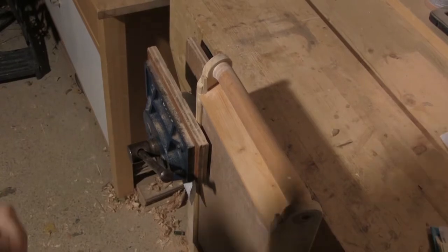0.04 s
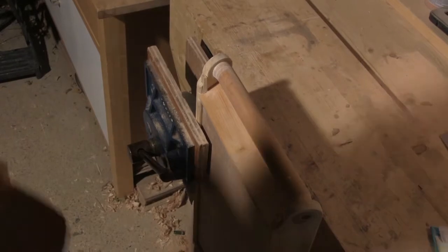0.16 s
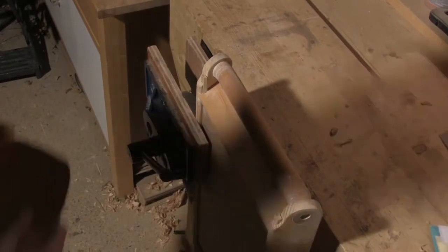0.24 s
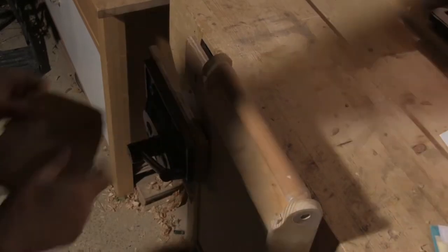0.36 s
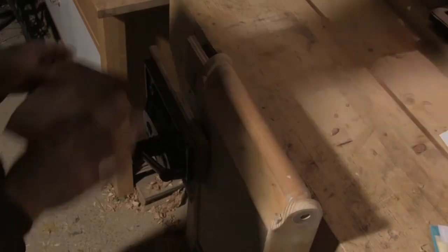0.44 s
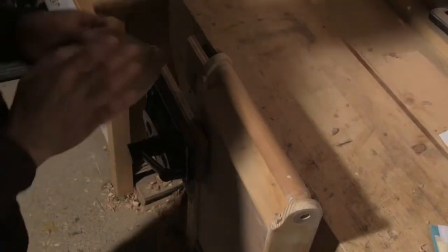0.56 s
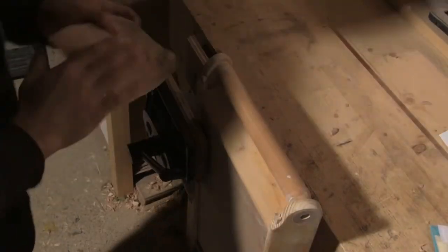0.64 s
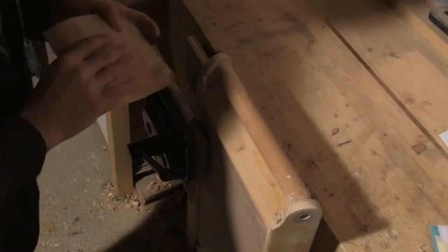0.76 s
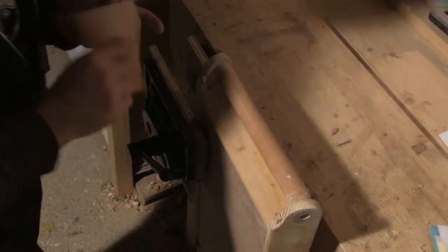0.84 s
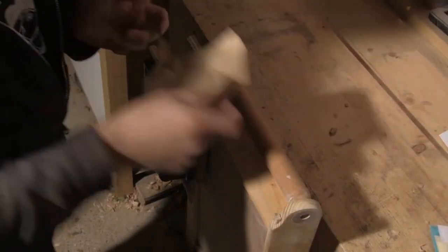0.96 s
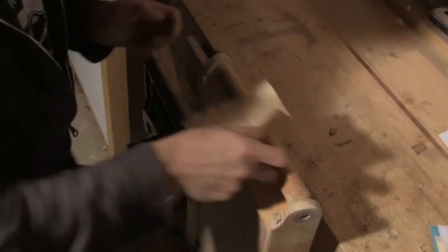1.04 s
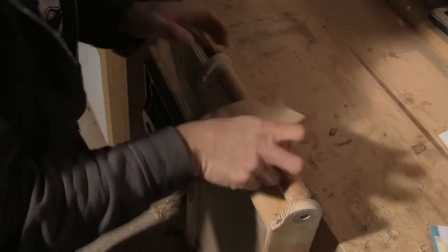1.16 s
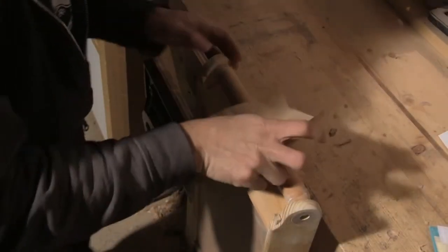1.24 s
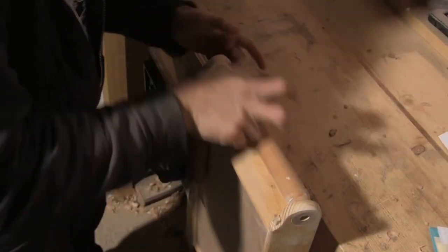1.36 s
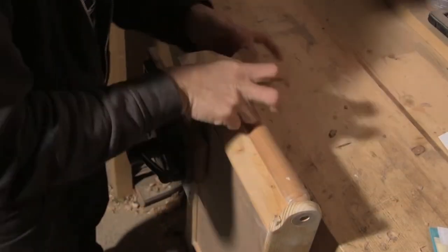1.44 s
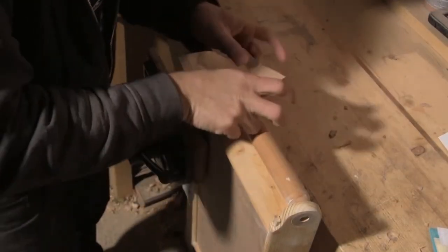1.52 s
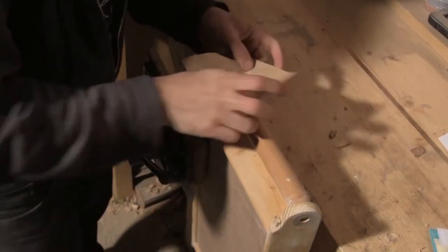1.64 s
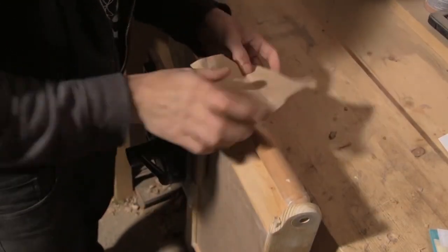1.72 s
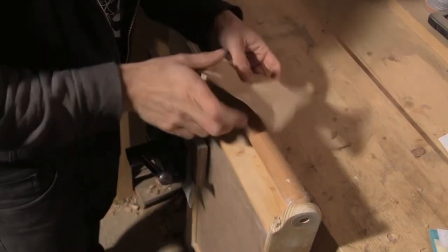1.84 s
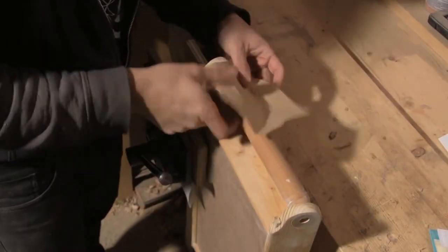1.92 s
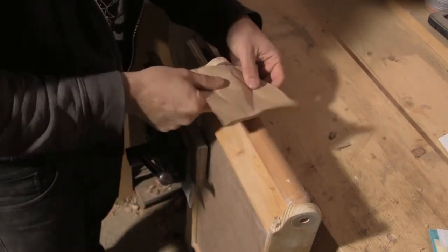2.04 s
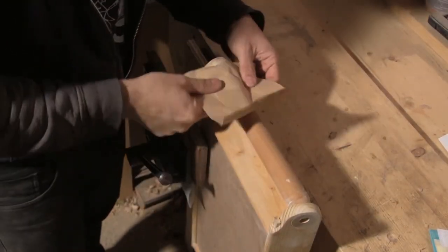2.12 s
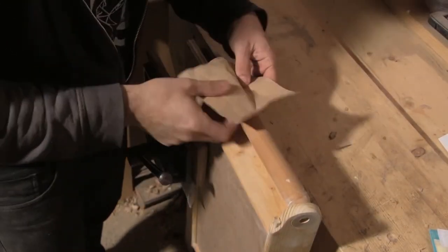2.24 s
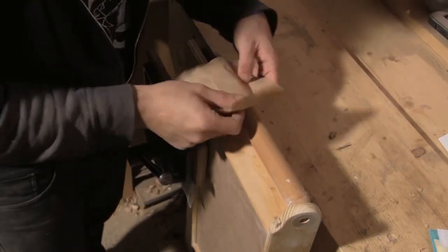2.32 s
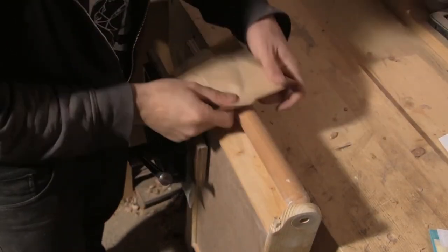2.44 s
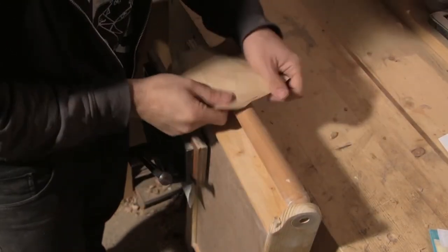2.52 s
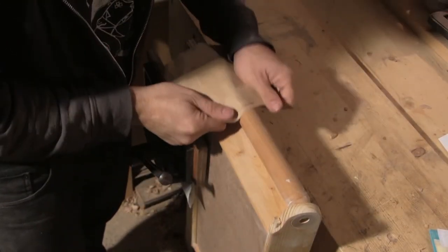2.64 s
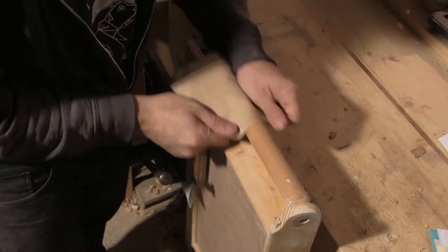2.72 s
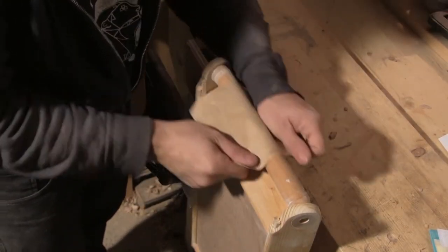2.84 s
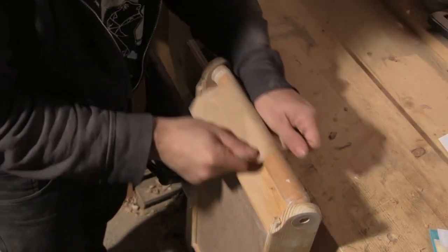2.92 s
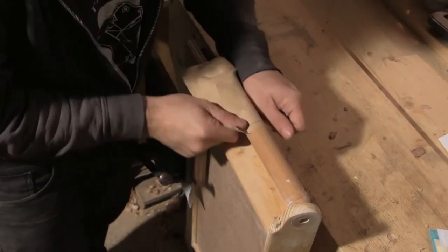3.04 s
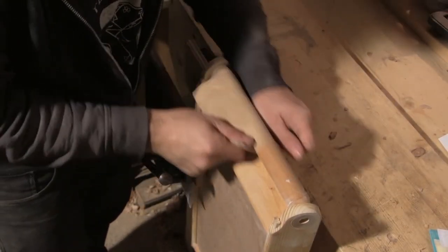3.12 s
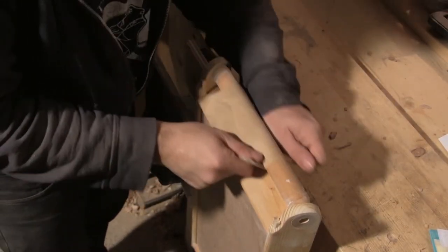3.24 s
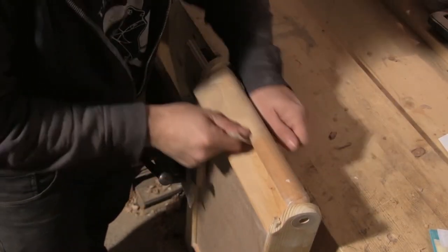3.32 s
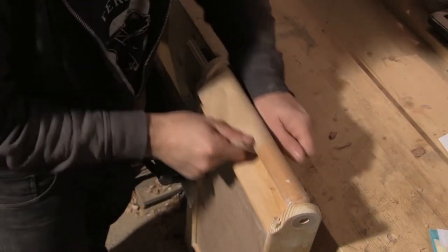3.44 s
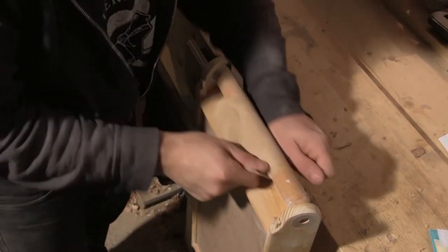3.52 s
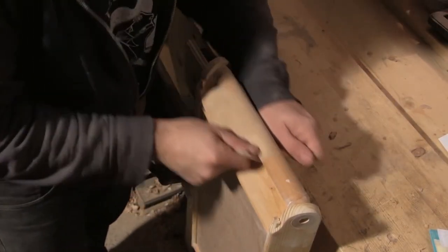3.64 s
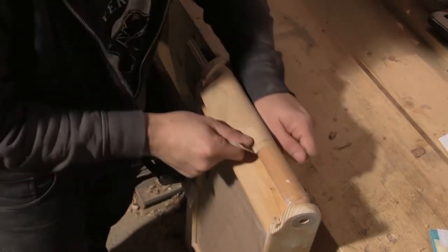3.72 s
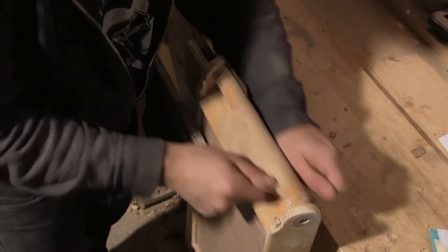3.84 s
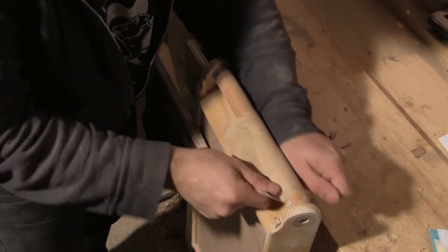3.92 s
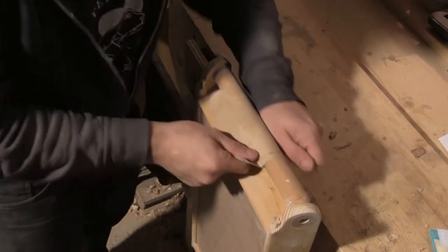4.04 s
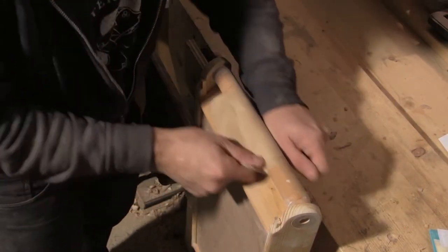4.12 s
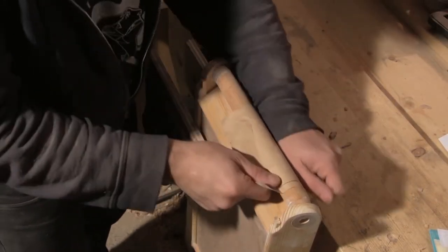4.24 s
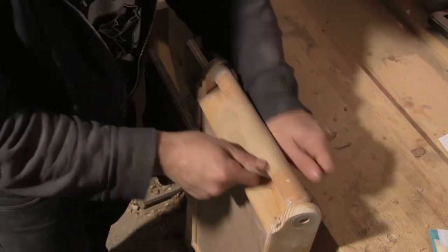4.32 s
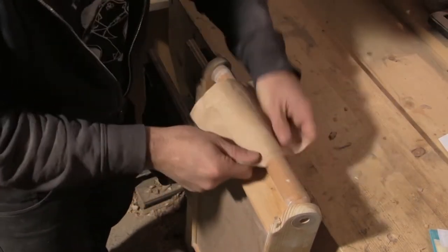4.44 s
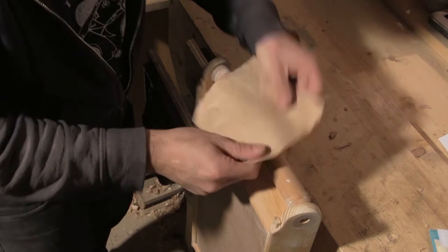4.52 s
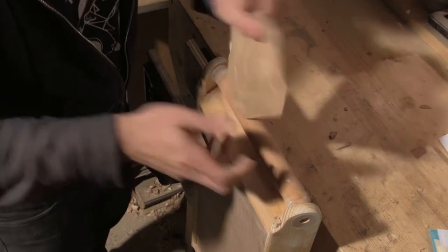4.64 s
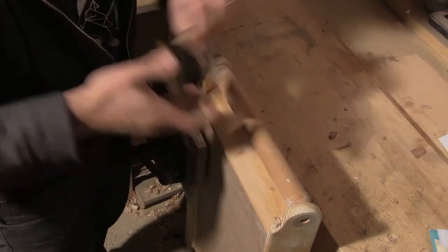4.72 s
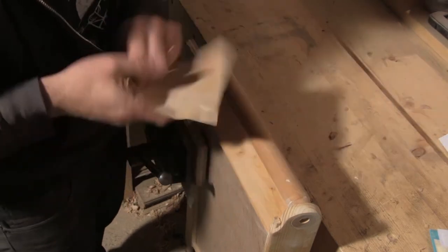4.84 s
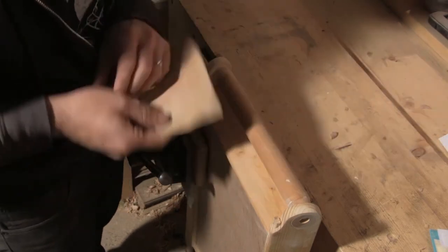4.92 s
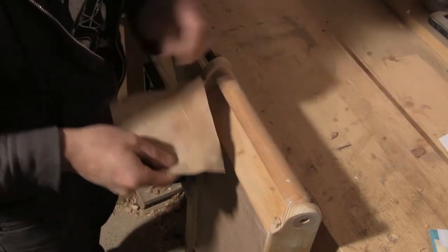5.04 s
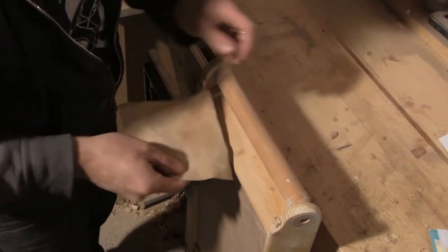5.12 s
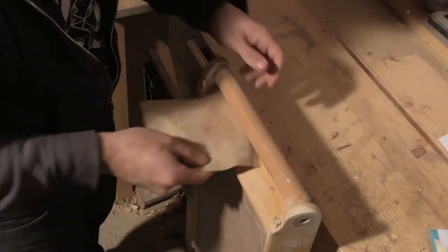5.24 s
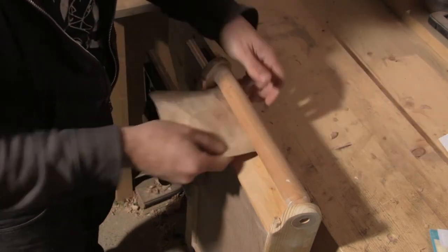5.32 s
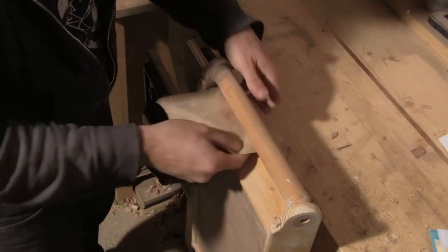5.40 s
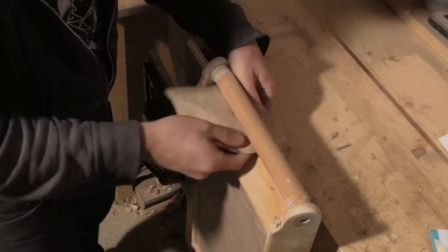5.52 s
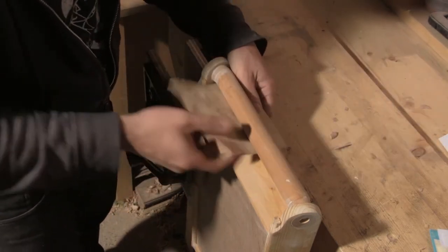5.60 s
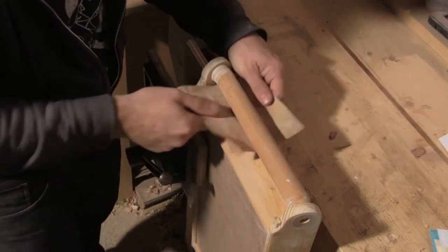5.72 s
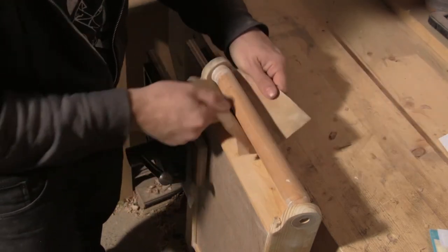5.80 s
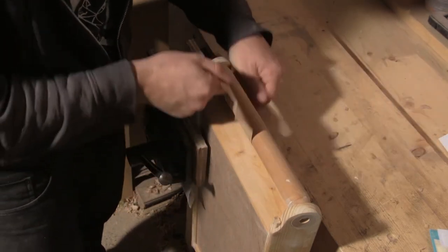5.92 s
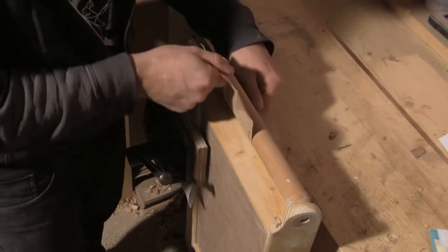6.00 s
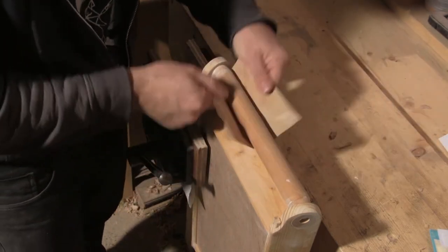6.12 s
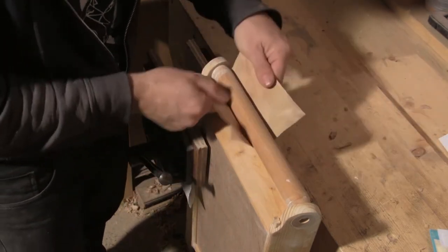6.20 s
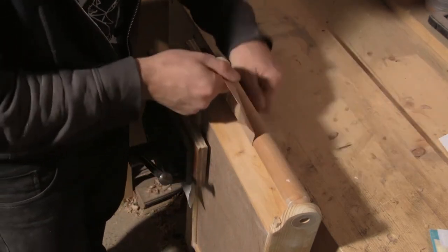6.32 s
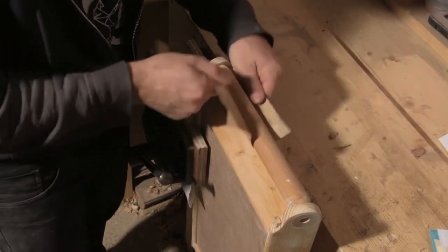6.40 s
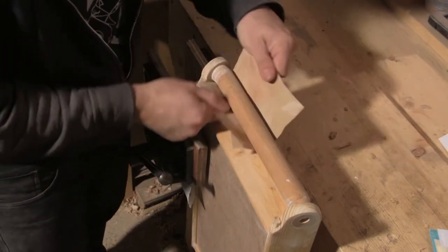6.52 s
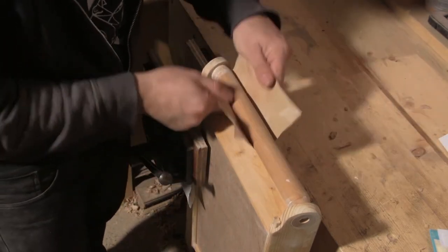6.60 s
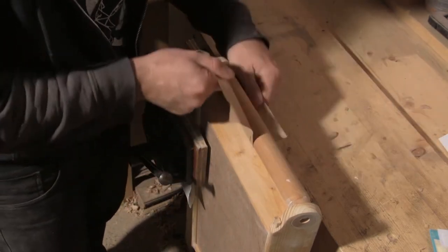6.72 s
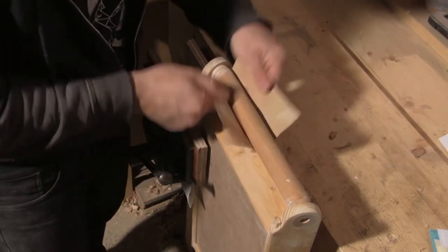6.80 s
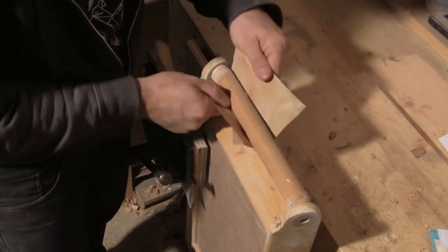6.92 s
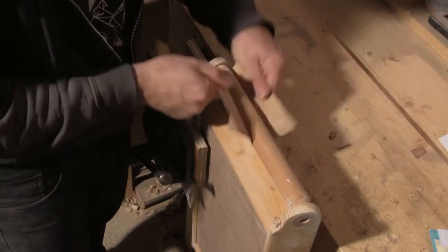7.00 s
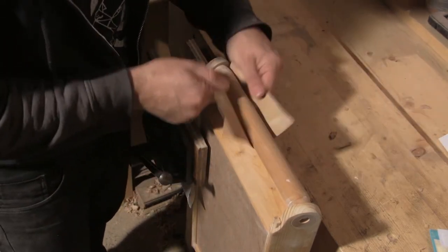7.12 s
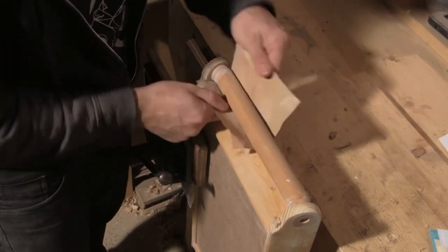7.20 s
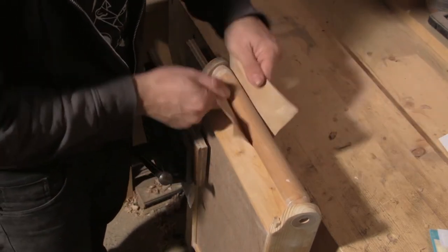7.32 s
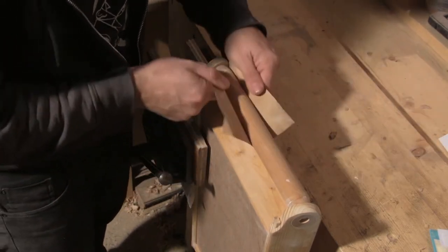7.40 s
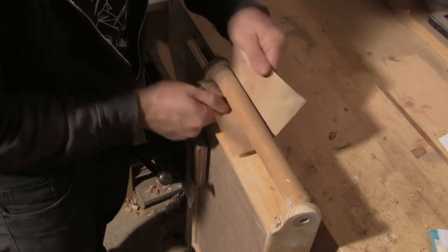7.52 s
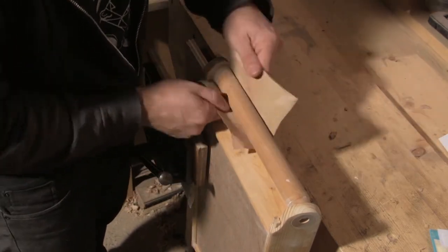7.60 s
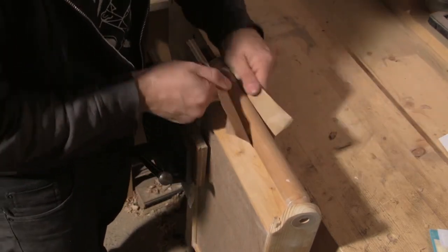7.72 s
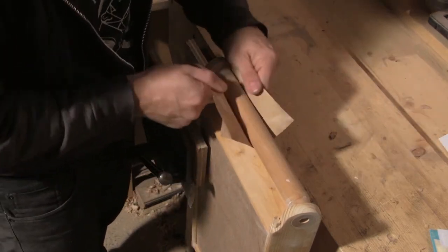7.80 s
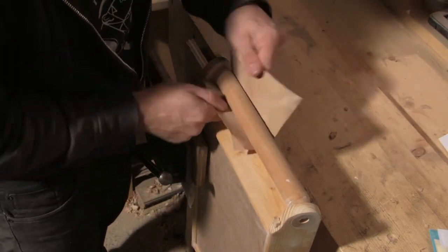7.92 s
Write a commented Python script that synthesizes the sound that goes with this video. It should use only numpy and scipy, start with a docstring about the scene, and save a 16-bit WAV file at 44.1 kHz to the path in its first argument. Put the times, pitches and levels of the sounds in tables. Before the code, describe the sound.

Sandpaper crinkles and snaps in the hands, then rasps along a wooden handle in quick even strokes, paused once and resumed harder in a small workshop.

```python
"""Sandpaper on a round wooden handle

A sheet is handled, wrapped over the handle and pulled to and fro in a small workshop, then threaded under it
for shorter, harder strokes. Dense grit clicks ring through paper, handle and box; bends and knocks are short
bursts of resonant noise. A bench shudder, the shop's echoes and its quiet air lie around them, on one microphone.
"""
import sys
import numpy as np
from scipy import signal
from scipy.fft import rfft, irfft, next_fast_len
from scipy.io import wavfile

SR = 44100
rng = np.random.default_rng(int(sys.argv[2]) if len(sys.argv) > 2 else 0)


def to_wav(s):
    """Save 16-bit WAV."""
    ch = np.atleast_2d(s).T  # columns
    pcm = np.round(np.clip(ch, -1, 1) * 32767)  # PCM
    wavfile.write(sys.argv[1], SR, pcm.astype(np.int16))


N = 351036


def from_db(db):
    """Amplitude gain of a level in dB."""
    return 10 ** (np.asarray(db) / 20)


def rms_one(x):
    """Scale to unit rms."""
    return x / np.sqrt(np.mean(x ** 2) + 1e-20)


def peak_one(x):
    """Scale to unit peak."""
    return x / np.max(np.abs(x))


def at_hz(points, hz):
    """Read a spectrum in dB on a log frequency axis."""
    point_hz, level_db = np.transpose(points)
    return np.interp(np.log(hz), np.log(point_hz), level_db)


def drift(rate_hz):
    """Slow random wander with spread near 1: noise through two equal low-passes, made at SR / 40."""
    r = np.exp(-80 * np.pi * rate_hz / SR)
    noise = rng.standard_normal(N // 40 + 2002)
    slow = signal.lfilter([1], [1, -2 * r, r * r], noise)[2000:]   # drop the filter's start-up
    return np.interp(np.arange(N) / 40, np.arange(len(slow)), rms_one(slow))


def resonate(x, hz, width_hz):
    """Two-pole resonance with gain 1 at its top."""
    r = np.exp(-np.pi * width_hz / SR)
    poles = [1, -2 * r * np.cos(2 * np.pi * hz / SR), r * r]
    return signal.lfilter([(1 - r * r) / 2, 0, (r * r - 1) / 2], poles, x)


# quiet of the shop, relative spectrum: (f/Hz, level/dB per Hz)
AIR_SPECTRUM = [(12, -45), (30, -6), (70, -3), (140, -2), (220, 8.5), (420, -5), (790, -3), (1270, -6),
                (2920, -6.5), (9960, -36), (15600, -44)]
AIR_DB = -61   # middle of the wavering level


def air():
    """Slightly wavering low rumble and faint hiss of the shop: noise shaped by a fixed spectrum."""
    hz = np.arange(1, N // 2 + 2) * SR / N
    shaped = irfft(rfft(rng.standard_normal(N)) * from_db(at_hz(AIR_SPECTRUM, hz)), N)
    return from_db(AIR_DB + 0.53 * drift(2.3)) * rms_one(shaped)


# the bench rocks under the strokes: (t/s, level/dB before a small trim)
BENCH_ROCKING = [(0.0, -82), (0.53, -85), (2.88, -72), (2.9, -64), (3.21, -71), (3.26, -88), (3.41, -66),
                 (3.79, -78), (3.86, -73), (5.23, -81), (5.25, -90), (5.45, -70), (5.5, -83), (7.54, -64),
                 (7.65, -76), (7.69, -64), (7.92, -82), (7.96, -76)]
ROCKING_HZ, ROCKING_WIDTH_HZ = 75.4, 35


def rocking():
    """A deep shudder of the bench: noise through two low resonances, swelling and sinking in level."""
    s, level_db = np.transpose(BENCH_ROCKING)
    shudder = resonate(rng.standard_normal(N), ROCKING_HZ, ROCKING_WIDTH_HZ)
    shudder = resonate(shudder, ROCKING_HZ, 60)
    trim_db = -0.5
    return from_db(np.interp(np.arange(N) / SR, s, level_db) + trim_db) * rms_one(shudder)


# each rub of the sheet, light brushes and full strokes alike, levels before the trims in sliding():
# (start t/s, length t/s, fastest moment as share of the length, rasp level/dB, then level/dB against the rasp:
# bite of the grit, fine hiss, drumming of the box, hollow of the sheet; brightening from start to end/dB)
RUB_STROKES = [(0.014, 0.095, 0.9, -56, -7, -1, -2, 4, 11),
               (0.087, 0.24, 0.076, -56, 0.5, -1.5, -20, -3, 6),
               (0.2, 0.067, 0.46, -58.5, 6, -2, -5, -1, 0), (0.343, 0.081, 0.85, -60, 1, -1.5, -9, 4, 4),
               (0.436, 0.054, 0.85, -58, -5, -9, 2, -13, -6),
               (0.493, 0.087, 0.061, -48.5, -7, -14.5, -4, -6.5, 4),
               (0.667, 0.104, 0.57, -54, -0.5, -9, -11, -15, 5),
               (0.774, 0.037, 0.9, -57, -2, -7, -12, -10, -2), (0.811, 0.09, 0.17, -46.5, 1, -4, -5, 3, -3),
               (0.897, 0.077, 0.24, -48.5, 0, -5, -10, 0, -7),
               (0.956, 0.11, 0.21, -47, -3, -12, -2, 7.5, 19),
               (1.041, 0.12, 0.07, -53.5, -3, -8, -5, -6, -3),
               (1.177, 0.12, 0.14, -41.5, -4.5, -6, -7.5, -5.5, 8),
               (1.304, 0.13, 1, -40.5, -4, -8, -5.5, -4.5, 0),
               (1.43, 0.12, 0.63, -39.5, -0.5, 1.5, -12, -5, -20),
               (1.507, 0.047, 0.08, -34, -8, -16, -10.5, -3, 0),
               (1.536, 0.12, 0.17, -47.5, -1, -15, -2, -5, 0),
               (1.677, 0.095, 0.87, -48, 2, -7, -16, -11, -11),
               (1.757, 0.11, 0.39, -42, -8.5, -14, -16, -9, -9),
               (1.888, 0.1, 0.51, -45, -5.5, -15, -10, -6, -1),
               (1.988, 0.067, 0.9, -43.5, -5, -15, -7, -8, 2),
               (2.056, 0.11, 0.93, -37.5, -4.5, -11, -4.5, -9, 12),
               (2.206, 0.088, 0.38, -51, 3, -12, -1, -8, 3),
               (2.28, 0.062, 0.06, -35.5, -6, -15, -13, -8, -3), (2.3, 0.15, 0.3, -50, -3, -7, -10, -20, 0),
               (2.377, 0.21, 0.8, -46, -3, -8, -2, -20, -5),
               (2.517, 0.099, 0.65, -38.5, -4.5, -4.5, -8, -10, 0),
               (2.621, 0.15, 0.45, -45.5, -1, -9, -1, 8, 0),
               (2.76, 0.24, 0.49, -27, -1.5, -5.5, -15, -7, 7),
               (3.019, 0.14, 0.61, -25.5, -5.5, -6.5, -15, -10.5, -5),
               (3.181, 0.15, 0.63, -27, -1.5, -5, -14.5, -12, 5),
               (3.359, 0.12, 0.67, -23.5, -5, -8, -17.5, -15.5, -4),
               (3.511, 0.17, 0.43, -27, -4, -3.5, -19, -14.5, 10),
               (3.702, 0.13, 0.51, -27.5, -5.5, -6.5, -20, -17, -11),
               (3.857, 0.16, 0.62, -28, -2, -1.5, -30, -14.5, -8),
               (4.049, 0.15, 0.43, -26, -3, -4, -20.5, -15.5, -3),
               (4.216, 0.16, 0.53, -29, -4.5, -4, -17, -11, -2),
               (4.388, 0.19, 0.25, -27.5, -2.5, -4.5, -21, -14.5, 3),
               (4.556, 0.17, 0.053, -41, -3.5, -4.5, -24, -6.5, -10),
               (4.746, 0.083, 0.07, -53, -12, -6, -3, -2, 2),
               (4.867, 0.043, 0.059, -45.5, 0, -5, 7, -1, -6),
               (4.91, 0.088, 0.69, -41.5, -2, -8, -6, -2, 4),
               (4.996, 0.075, 0.062, -39.5, -2, -2.5, -4.5, -3.5, -6),
               (5.093, 0.033, 0.07, -52.5, -5, -13, 5, -4, 10),
               (5.283, 0.049, 0.99, -60, -4, -16, -6, 6, 10), (5.332, 0.061, 0.51, -50, 7, 3, 12, -3, 1),
               (5.409, 0.11, 0.35, -37, 1.5, -7.5, -7, -13, 19),
               (5.489, 0.11, 0.46, -36.5, 5, -3.5, -3, -5.5, -5), (5.623, 0.063, 1, -54, 9, -8, 5, 5, -8),
               (5.685, 0.2, 0.36, -43, 1, -8.5, -9, -5, -7), (5.869, 0.082, 0.21, -41, -3, -13, -4, -6, -7),
               (5.964, 0.14, 0.91, -29.5, 1.5, -4.5, -17.5, -8.5, -2),
               (6.184, 0.11, 0.64, -24.5, 3.5, -1.5, -9, -8.5, -7),
               (6.3, 0.065, 0.5, -46, -14, -10, -10, -3, 0), (6.35, 0.14, 0.22, -27.5, 3.5, 0, -13, -4, 1),
               (6.521, 0.12, 0.34, -26.5, 4.5, 0.5, -15, -6, -10),
               (6.702, 0.12, 0.24, -26.5, 3.5, 2, -14, -8, 12),
               (6.868, 0.11, 0.59, -25, 1.5, 0, -11.5, -8, -9), (7.0, 0.038, 0.37, -42, -12, -13, 0, -4, 3),
               (7.056, 0.12, 0.31, -25, 0.5, -0.5, -12, -7, 7),
               (7.225, 0.12, 0.39, -26, 2.5, 0.5, -5, -8, -9),
               (7.402, 0.11, 0.51, -24.5, -0.5, -2, -11.5, -7, -4),
               (7.581, 0.091, 0.18, -22.5, -2.5, -4, -11, -9, -8),
               (7.755, 0.11, 0.34, -23, -1, -3.5, -12.5, -11.5, -10.5),
               (7.945, 0.098, 0.17, -21, -0.5, -3, -14, -13, 4)]
# faint rustle of sheet and fingers, running on under and between the rubs:
# (t/s, middle level/dB, treble level/dB, low level/dB), before the trims in sliding()
RUSTLE_LEVELS = [(0.0, -49, -59.5, -55), (0.3, -80, -70, -66), (0.63, -85, -72, -81), (1.15, -54, -58, -67),
                 (1.67, -54, -61, -61), (2.2, -52.5, -54.5, -48), (2.74, -47, -54, -54.5),
                 (3.5, -44.5, -51, -48), (4.4, -52, -51, -48.5), (4.84, -78, -57, -66.5),
                 (5.2, -71, -69.5, -67), (5.4, -65, -63, -62), (5.65, -54, -53, -52.5),
                 (6.15, -49, -51.5, -51), (6.5, -44, -46, -44.5), (7.0, -43.5, -46.5, -46.5),
                 (7.57, -56, -50, -49), (7.96, -55, -52, -57)]
# level/dB added to the rustle's treble for bite and hiss, and to its low for box and hollow
RUSTLE_SPLIT = [-0.5, -3, 0, -3.1]
# loudness follows hand speed to these powers: (rasp, bite, hiss, box, hollow)
HAND_SPEED_POWER = [1.02, 1.2, 1.13, 0.6, 0.75]
# change from start to end of every rub: (rasp, bite, hiss, box, hollow), each level/dB
RUB_LEAN = [-0.45, -1, 0.85, 2.4, 1.7]
# share of a rub's own brightening: (rasp, bite, hiss, box, hollow)
BRIGHTENING_SHARE = [-0.35, .6, 0.17, -0.79, -0.69]
BREAKAWAY_RAD = 0.31   # the sheet sticks at first and breaks loose part way up the arch
RING_OUT_S = 0.0074    # the sheet keeps sounding briefly as the hand slows


def hand():
    """Levels in dB of rasp, bite, hiss, box and hollow: each rub's speed is a lopsided arch over the rustle."""
    t = np.arange(N) / SR
    s, middle_db, treble_db, low_db = np.transpose(RUSTLE_LEVELS)
    rustle_db = np.array([middle_db, treble_db, treble_db, low_db, low_db])
    rustle_db = rustle_db + np.r_[0, RUSTLE_SPLIT][:, None]
    power = np.zeros((5, N))
    for start, length, fastest, rasp_db, *colour_db, brighter_db in RUB_STROKES:
        span = slice(max(round(start * SR), 0), round((start + length) * SR))
        along = (t[span] - start) / length
        turns = [0, np.clip(fastest, .03, .97), 1]
        phase = np.interp(along, turns, [BREAKAWAY_RAD, np.pi / 2, np.pi])
        loudness = np.abs(np.sin(phase)) ** np.array(HAND_SPEED_POWER)[:, None]
        lean_db = np.array(RUB_LEAN) + brighter_db * np.array(BRIGHTENING_SHARE)
        level_db = rasp_db + np.r_[0, colour_db][:, None] + np.outer(lean_db, along - .5)
        power[:, span] += (from_db(level_db) * loudness) ** 2
    r = np.exp(-1 / (RING_OUT_S * SR))
    power = signal.lfilter([1 - r], [1, -r], power + 1e-18)
    rustle = from_db([np.interp(t, s, level) for level in rustle_db])
    return 10 * np.log10(power + rustle ** 2)


def grit(per_s, spread_db):
    """Grains of abrasive catching the fibres: random clicks of uneven size and either sign."""
    sizes = from_db(spread_db * np.minimum(rng.exponential(1, N), 4)) * rng.choice([-1, 1], N)
    return rms_one(sizes * (rng.random(N) < per_s / SR))


def body(x, modes, lift_db, wander_db):
    """The direct sound plus the modes, each rung more or less as the contact moves along the wood."""
    out = x
    for hz, width_hz, level_db in modes:
        gain = from_db(lift_db + level_db + wander_db * drift(5.4))
        out = out + gain * resonate(x, hz, width_hz)
    return out


# basic colour of the rasp, relative spectrum: (f/Hz, level/dB per Hz)
RASP_SPECTRUM = [(60, -60), (110, -26), (160, -28.5), (215, -9.5), (300, -5), (420, -7), (650, -7.5),
                 (960, -9), (1300, -4.5), (2000, -1.5), (4000, -5), (8250, -9), (12300, -12.5),
                 (15600, -21.5)]
# resonances of handle, box and sheet, sheet over the handle: (f/Hz, width f/Hz, level/dB before body()'s lift)
OVER_MODES = [(225, 40, -5), (428, 30, 6), (660, 60, -10), (1030, 70, -7), (1400, 70, -7), (1660, 60, -3),
              (1945, 70, -7), (2340, 70, -6), (2570, 80, -6), (3840, 90, -7)]
# the same with the sheet under the handle: (f/Hz, width f/Hz, level/dB before body()'s lift)
UNDER_MODES = [(425, 40, -6), (465, 40, -4), (888, 55, -4), (1030, 55, -5), (1385, 70, -6), (1515, 60, -7),
               (1770, 90, -6), (1950, 90, -4), (2200, 70, -5), (2810, 80, -6)]
THREADED_S = 5.2   # the sheet changes place


def sliding():
    """Grit clicks ring the body; each half-octave follows the stroke and flickers as contact patches come and go."""
    t = np.arange(N) / SR
    rasp_db, *levels_db = hand()
    bite_db, hiss_db, box_db, hollow_db = levels_db - rasp_db
    clicks = grit(per_s=14000, spread_db=0.7)
    over = body(clicks, OVER_MODES, lift_db=2.5, wander_db=4)
    under = body(clicks, UNDER_MODES, lift_db=2.5, wander_db=4)
    rung = np.where(t < THREADED_S, over, under)
    size = next_fast_len(N)
    hz = np.arange(1, size // 2 + 2) * SR / size
    spectrum = rfft(rung, size) * from_db(at_hz(RASP_SPECTRUM, hz))
    out, together = np.zeros(N), drift(25.0)
    for centre_hz in 100 * 2 ** np.arange(0, 8, .5):
        window = np.clip(1 - 2 * np.abs(np.log2(hz / centre_hz)), 0, 1)
        band = irfft(spectrum * window, size)[:N]
        # share of each control in this band: box lowest, then hollow, rasp, bite and hiss
        octave = np.log2(centre_hz / 400)
        box, hollow, _, bite, hiss = (np.interp(octave, [0, 1, 2.3, 3.3, 4.6], w) for w in np.eye(5))
        colour_db = box * (box_db + 8.0) + hollow * (hollow_db + 11)
        colour_db = colour_db + bite * (bite_db + 5.0) + hiss * (hiss_db + 5.5)
        flicker_db = 1.26 * together + 2.18 * drift(8.8)   # shared by all bands, and this band's own
        out += band * from_db(colour_db + flicker_db)
    return from_db(rasp_db + 3.5) * rms_one(out)


# snaps and taps of sheet on wood, a few followed by their own bounce off the bench:
# (t/s, peak level/dB before bench echo and body, centre f/Hz, noise t60 t/s,
# treble level/dB and thud level/dB against the ring, both before the trims in snaps())
SHEET_SNAPS = [(0.0358, -35, 595, 0.076, -1, -6), (0.0855, -28.5, 620, 0.1, -26, -10),
               (0.219, -54, 344, 0.05, -15, -24), (0.247, -44, 232, 0.04, -16, -11),
               (0.2659, -35, 546, 0.047, -16, 9), (0.273, -37, 535, 0.035, -31, 11),
               (0.298, -46, 300, 0.04, -20, -18), (0.321, -37.5, 1000, 0.061, -19, 1),
               (0.468, -45.5, 412, 0.04, -15, -5), (0.676, -56, 392, 0.04, -13, -19),
               (0.7137, -38.5, 2820, 0.04, -6, -23), (0.818, -50, 252, 0.04, -15, -15),
               (0.9251, -37, 860, 0.04, 8, -11), (0.9527, -41, 1030, 0.03, -12, -7),
               (0.98, -26, 1130, 0.04, -20, -19), (1.203, -32.5, 716, 0.05, -10, -8),
               (1.5062, -16.5, 2030, 0.049, 18.5, -7), (1.51, -22, 1500, 0.038, -6, -30),
               (2.0567, -38, 480, 0.04, -10, -10), (2.126, -27.5, 2090, 0.037, -9, -17),
               (2.2812, -16.5, 1790, 0.085, 13, -14.5), (2.283, -14, 5250, 0.022, -16, -21.5),
               (2.3911, -30.9, 4060, 0.14, 2, -21), (2.47, -34.5, 4000, 0.028, 9, -24),
               (2.498, -39.5, 270, 0.04, -7, -9), (2.5385, -45, 415, 0.04, -1, -9),
               (2.6038, -23.5, 3320, 0.028, -6, -11.5), (2.637, -30, 1440, 0.035, -1, -10),
               (2.6501, -29.5, 448, 0.048, 12.5, -25), (2.668, -44, 440, 0.037, -1, -10),
               (2.6966, -25, 2980, 0.025, -3, -22), (2.7061, -25.5, 2960, 0.068, -7, -34),
               (2.753, -38.5, 428, 0.034, -15, -11), (3.06, -37, 413, 0.036, -20, -10),
               (3.109, -25, 440, 0.11, -22.5, -11), (3.449, -30, 333, 0.067, -22, -6),
               (3.532, -34.5, 553, 0.035, -20, -12), (4.062, -38, 417, 0.04, -15, -12),
               (4.76, -36, 4570, 0.029, -4, -22), (4.875, -33, 820, 0.046, -10, -10),
               (4.9175, -33, 563, 0.048, -10, -9), (5.1003, -44, 497, 0.04, -13, -8),
               (5.1427, -38, 570, 0.043, -22, -9), (5.2158, -41, 644, 0.058, -18, -16),
               (5.221, -43, 387, 0.024, -20, -10), (5.2927, -41.5, 1040, 0.06, -12, -12),
               (5.365, -40, 410, 0.05, -17, -1), (5.538, -32.5, 450, 0.042, -20, -8),
               (5.992, -32.5, 360, 0.053, -20, 0), (6.248, -22, 600, 0.033, -20, -19),
               (6.265, -27, 500, 0.036, -29, -7), (6.3293, -23, 1190, 0.083, -14, -6),
               (6.373, -30, 283, 0.04, -20, -13), (6.748, -29.5, 463, 0.045, -20, -12),
               (7.0113, -25.5, 410, 0.062, -11, -2), (7.758, -37, 484, 0.05, -24, -12)]
BENCH_ECHO_S, BENCH_ECHO_DB = 0.0055, -19


def snaps():
    """A sudden give or a bounce rings a patch of sheet or wood and thuds in the box; a short crackle follows."""
    out, t = np.zeros(N), np.arange(round(.12 * SR)) / SR
    noises = rng.standard_normal((len(SHEET_SNAPS), len(t)))
    for (s, peak_db, hz, t60, treble_db, thud_db), noise in zip(SHEET_SNAPS, noises):
        # high patches crackle on after the give, low ones mostly knock once
        push = noise * from_db(-60 * t / t60) * np.sqrt(hz / 1000)
        push[0] -= 24.0
        soft = np.exp(-2 * np.pi * 2.0 * hz / SR)   # a soft contact has a rounded front
        push = signal.lfilter([1 - soft], [1, -soft], push)
        ring = resonate(resonate(push, hz, 0.13 * hz + 30), hz, 1.8 * hz)
        crack = resonate(resonate(noise * from_db(-60 * t / 0.042), 2200, 2300), 2300, 4800)
        thud = resonate(resonate(push, 314, 680), 470, 1350)
        thud = thud + from_db(-3.0) * resonate(resonate(push, 182, 114), 200, 260)
        burst = peak_one(ring) + from_db(treble_db - 13) * peak_one(crack)
        burst = burst + from_db(thud_db + 12.0) * peak_one(thud)
        at = round(s * SR)
        out[at:at + len(t)] += from_db(peak_db) * peak_one(burst)
    lag = round(BENCH_ECHO_S * SR)
    out[lag:] += from_db(BENCH_ECHO_DB) * out[:-lag]   # the bench top throws each burst back once
    return body(out, OVER_MODES, lift_db=3, wander_db=0)


SHOP_T60_S, WALL_CUT_HZ = 0.19, 1250   # decay time in the bass, and where the gentle treble loss sets in


def shop(x):
    """Echoes of the small room: ten feedback delays of alternating sign, duller on every round."""
    size = next_fast_len(N + SR)
    w = 2 * np.pi * np.arange(size // 2 + 1) / size
    dull = 1 / (1 + 1j * w * SR / (2 * np.pi * WALL_CUT_HZ)) ** 0.36
    echo = 0
    lags_s = [.0113, .0131, .0149, .0167, .0191, .0211, .0239, .0263, .0293, .0331]
    for k, lag in enumerate(lags_s):
        loop = from_db(-60 * lag / SHOP_T60_S) * dull * np.exp(-1j * w * lag * SR)
        echo = echo + (-1) ** k * loop / (1 - loop)
    return irfft(rfft(x, size) * echo, size)[:N]


def scene():
    """Paper, its echoes, the bench and the quiet of the shop, alike in both channels."""
    rub, cracks = sliding(), snaps()
    echoes = shop(from_db(-15.0) * rub + from_db(-14.0) * cracks)
    mono = rub + cracks + echoes + rocking() + air()
    return np.vstack([mono, mono])


CUTOFF_HZ = 15650   # top of the treble


def record(dry):
    """The microphone drops the deepest bass, peaks are rounded, the top is cut."""
    x = signal.sosfilt(signal.butter(3, 50, "high", fs=SR, output="sos"), dry)
    x = .33 * np.tanh(x / .33)
    return signal.sosfilt(signal.ellip(14, .5, 70, CUTOFF_HZ, fs=SR, output="sos"), x)


dry = scene()
out = record(dry)
to_wav(out)
```